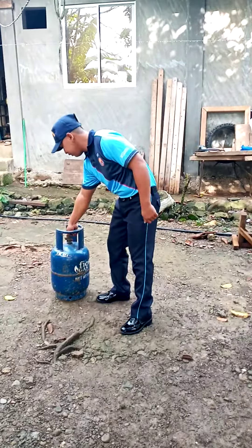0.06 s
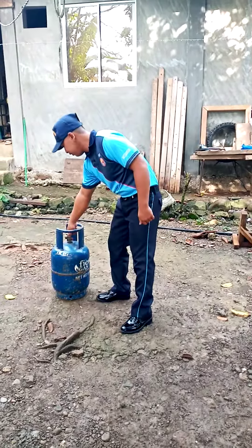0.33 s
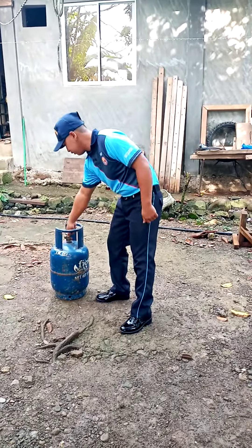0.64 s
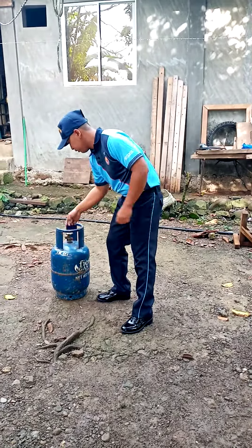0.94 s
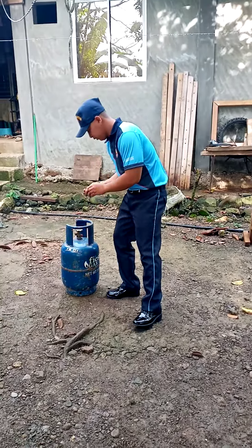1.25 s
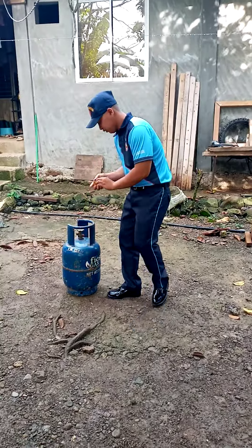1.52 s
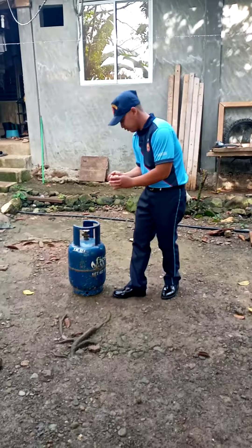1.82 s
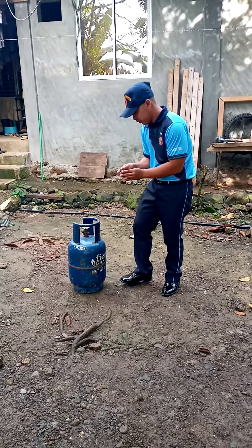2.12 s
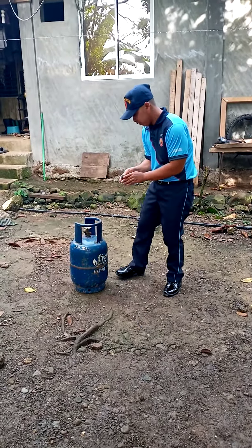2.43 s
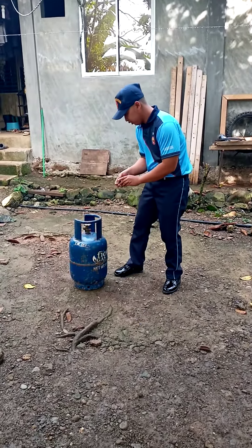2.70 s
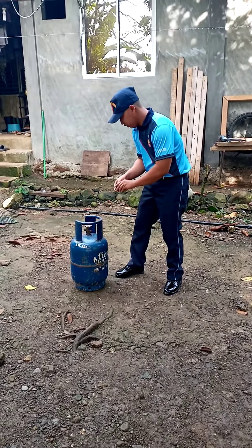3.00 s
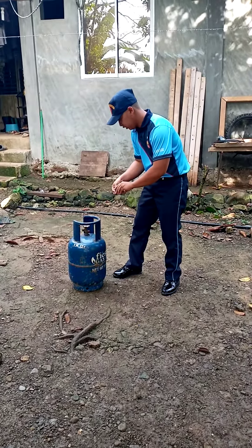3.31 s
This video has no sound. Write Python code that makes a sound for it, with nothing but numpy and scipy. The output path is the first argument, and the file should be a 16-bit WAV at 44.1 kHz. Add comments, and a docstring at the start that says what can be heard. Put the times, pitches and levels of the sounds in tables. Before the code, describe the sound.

A hiss of gas escapes from a cylinder valve in a dirt yard, heard through one microphone. Early spurts and a low thump give way to a steady jet, while a rough lower rush fades and shoes scuff lightly.

```python
"""Gas escaping from the valve of a steel cylinder, heard through one microphone in a dirt yard.
The valve is opened by hand; the jet hisses through the resonances of the outlet, with a ragged lower
rush that dies away. It surges a few times, once with a low thump. Softer bumps and gritty scuffs of
hands and shoes lie underneath. Ground and house wall scatter the hiss; faint noise comes from far off."""
import sys
import numpy as np
from scipy import signal
from scipy.fft import rfft, irfft, next_fast_len
from scipy.io import wavfile
from scipy.ndimage import map_coordinates

SR = 44100
rng = np.random.default_rng(int(sys.argv[2]) if len(sys.argv) > 2 else 0)


def inscribe(sig):
    """Save sig as 16-bit PCM at rate SR to the path in sys.argv[1].

    A 1-D sig is mono; a 2-D sig holds one channel per row.
    Samples are clipped to [-1, 1] before scaling.
    """
    pcm = np.round(np.clip(np.atleast_2d(sig).T, -1, 1) * 32767)
    wavfile.write(sys.argv[1], SR, pcm.astype(np.int16))


N = 156555
TIME = np.arange(N) / SR


def from_db(db):
    """Decibels to gain."""
    return 10 ** (np.asarray(db) / 20)


def rms_one(x):
    """Scale to rms 1."""
    return x / np.sqrt(np.mean(x ** 2) + 1e-20)


def curve(rows):
    """Join (time_s, value) points by straight lines."""
    return np.interp(TIME, *np.transpose(rows))


def coloured(gain_at):
    """Noise of rms 1 whose spectrum is a function of frequency."""
    size = next_fast_len(N)
    hz = np.maximum(np.fft.rfftfreq(size, 1 / SR), 1)
    return rms_one(irfft(rfft(rng.standard_normal(size)) * gain_at(hz), size)[:N])


def noise(points):
    """Noise of rms 1 with a spectrum of (freq_hz, relative_db) points."""
    at, db = np.transpose(points)
    return coloured(lambda hz: from_db(np.interp(np.log(hz), np.log(at), db)))


def flutter(rate_hz):
    """Slow random wander of rms 1."""
    return coloured(lambda hz: 1 / (1 + (hz / rate_hz) ** 2))


def envelope(start, attack, hold, fade_db_per_s):
    """Straight rise, hold, even fade in dB."""
    age = TIME - start
    return np.clip(age / attack, 0, 1) * from_db(-fade_db_per_s * np.maximum(age - attack - hold, 0))


def echoes(direct, level_db=-1, t60_s=0.24):
    """Ground and house wall scatter a short tail to the microphone, finely combing the sound."""
    tail = rng.standard_normal(N) * from_db(-60 * np.minimum(TIME / t60_s, 2))
    return direct + from_db(level_db) * signal.fftconvolve(direct, tail / np.linalg.norm(tail))[:N]


def outlet_ring(modes, low_hz=1960):
    """Turbulence rings in the resonances of the outlet, which radiates little below low_hz."""
    def gain_at(hz):
        power = sum(from_db(db) ** 2 / (1 + ((hz - f) / width) ** 2) ** 2 for f, width, db in modes)
        return np.sqrt(power / (1 + (low_hz / hz) ** 20))
    return coloured(gain_at)


# Resonances of the outlet: pitch_hz, half_width_hz, relative_db
OUTLET_MODES = [(2190, 130, -9.5), (2475, 48, -4), (2672, 148, 0), (2890, 130, -10), (3330, 130, -11.5),
                (3810, 75, -16), (6600, 102, -10.5), (6836, 31, -11), (7114, 100, -12), (7380, 70, -10.5),
                (7585, 118, -17), (7771, 71, -15), (10217, 43, -17), (10766, 310, -21.5),
                (11060, 165, -18.5), (11520, 55, -19), (11739, 36, -18), (12089, 46, -19.5),
                (15694, 52, -16)]
# Tone of the lowest resonances as the valve opens: time_s, level_db
TONE_LEVEL = [(0, -51.5), (.218, -51), (.226, -39.5), (.26, -38.5), (.285, -46), (.33, -46), (.37, -39.5),
              (.62, -39), (.68, -37), (.87, -38.5), (1.06, -38), (1.14, -40), (1.22, -40), (2.25, -38.5),
              (2.6, -40.5), (2.92, -39), (3.0, -40), (3.55, -41)]
# That tone creeping upwards: time_s, pitch_ratio
TONE_TUNING = [(0, 0.98), (1.2, 0.98), (2.3, 1.0), (3.55, 1.008)]
# Broad hiss of the jet, before its tilt: freq_hz, relative_db
HISS_SPECTRUM = [(1500, -30), (1900, -14), (2700, -2), (3130, -7), (3400, -3), (4000, -6), (4700, -14),
                 (5650, -4), (6050, -8), (7000, -4), (9200, -5.5), (10600, -1.5), (11900, -7), (13100, -10),
                 (15800, 2)]
# Hiss and upper resonances together: time_s, level_db
HISS_LEVEL = [(0, -43.5), (.21, -48), (.228, -44), (.26, -39), (.3, -45), (.6, -38.5), (1.05, -39.5),
              (1.6, -41), (3.55, -42.5)]

def jet(split_hz=5000, waver_share=0.006, tilt_db_per_octave=-2, whistle_db=-4):
    """The outlet sounds a rough tone under a hiss with thin whistles; both flutter together."""
    tone = outlet_ring([mode for mode in OUTLET_MODES if mode[0] < split_hz])
    pitch_ratio = curve(TONE_TUNING) + waver_share * flutter(rate_hz=6.94)  # wavers with the flow
    tone = map_coordinates(tone, [np.cumsum(pitch_ratio)], order=3, mode="wrap")
    whistles = outlet_ring([mode for mode in OUTLET_MODES if mode[0] >= split_hz])
    broad = noise([(hz, db + tilt_db_per_octave * np.log2(hz)) for hz, db in HISS_SPECTRUM])
    hiss = rms_one(rms_one(echoes(broad)) + from_db(whistle_db) * whistles)
    unrest = flutter(rate_hz=16)
    tone_db = curve(TONE_LEVEL) + 0.6 * unrest
    hiss_db = curve(HISS_LEVEL) + 0.2 * unrest
    return from_db(tone_db) * tone + from_db(hiss_db) * hiss


# Ragged roar of gas, dying away: time_s, level_db
ROAR_LEVEL = [(0, -42), (.14, -52.5), (.22, -41.5), (.27, -55), (.32, -47), (.4, -41.5), (.6, -41.5),
              (.72, -46), (.78, -41), (.87, -54.5), (1.0, -39), (1.13, -42.5), (1.27, -46), (1.44, -41),
              (1.58, -45.5), (1.68, -40), (1.76, -45.5), (1.86, -42.5), (2.0, -45), (2.25, -46.5),
              (2.6, -49.5), (2.75, -50), (2.85, -54), (2.93, -49.5), (3.07, -68), (3.25, -59.5),
              (3.37, -67), (3.43, -56), (3.55, -62)]
# Its colour: freq_hz, relative_db
ROAR_SPECTRUM = [(200, -32), (450, -12), (650, -11), (1050, -0.5), (2700, 1.5), (4500, -15), (6800, -3.5),
                 (9000, -17), (16000, -20.5)]
# Rumble under the roar: time_s, level_db
RUMBLE_LEVEL = [(0, -64), (.3, -55.5), (.42, -49.5), (.65, -49), (.82, -66), (.89, -49.5), (.98, -38),
                (1.12, -46), (1.25, -53), (1.44, -52), (1.52, -56.5), (1.69, -51), (1.95, -72), (2.15, -70),
                (2.2, -54.5), (2.42, -54), (2.52, -77), (2.76, -55.5), (3.0, -86), (3.55, -70)]
# Its colour: freq_hz, relative_db
RUMBLE_SPECTRUM = [(30, -7), (60, -14), (95, 5.5), (170, 0.5), (230, -3), (400, -4), (600, -9.5),
                   (1200, -19.5)]

def rush():
    """A lower, unsteady roar of gas, partly echoed by the yard, with a rumble beneath it."""
    roar_db = curve(ROAR_LEVEL) + 1.75 * flutter(rate_hz=16)
    roar = rms_one(echoes(noise(ROAR_SPECTRUM)) + noise(ROAR_SPECTRUM))
    rumble_db = curve(RUMBLE_LEVEL) + 0.5 * flutter(rate_hz=36)
    return from_db(roar_db) * roar + from_db(rumble_db) * noise(RUMBLE_SPECTRUM)


# Surges at the valve: start_s, level_db, attack_s, hold_s, fade_db_per_s, treble_relative_db
SPURT_EVENTS = [(-.02, -47.5, 0.024, 0.16, 84, 5), (0.331, -30.5, 0.037, 0.034, 82, -3.5),
                (0.905, -32.7, 0.02, 0.066, 124, -1.5), (1.766, -42, 0.026, 0.057, 118, 5.5)]
# Their body: freq_hz, relative_db
BODY_SPECTRUM = [(60, -22), (200, -9.5), (700, -6.5), (1050, 0), (1800, -0.5), (2700, -4), (8000, -37)]
# Their treble: freq_hz, relative_db
TREBLE_SPECTRUM = [(1500, -25), (2800, 4), (5500, 1.5), (7000, 6.5), (8500, -3.5), (11000, -7),
                   (13000, -20), (15500, 1.5)]

def spurts():
    """Short surges of gas that open fast and fade."""
    body, treble = noise(BODY_SPECTRUM), noise(TREBLE_SPECTRUM)
    return sum(from_db(db) * envelope(start, attack, hold, fade) * (body + from_db(treble_db) * treble)
               for start, db, attack, hold, fade, treble_db in SPURT_EVENTS)


# Outdoor noise, far from the microphone: freq_hz, relative_db
YARD_SPECTRUM = [(20, -37), (60, 2), (140, 4), (250, -6), (600, -40), (2000, -16)]

def yard(level_db=-64):
    """Distant noise reaches the yard as a faint, steady bed."""
    return from_db(level_db) * noise(YARD_SPECTRUM)


# Hands on the cylinder, shoes on the dirt: start_s, level_db, slide_s, t60_s, centre_hz
SCUFF_EVENTS = [(0.026, -44.5, 0.015, 0.07, 396), (0.156, -42, 0.01, 0.15, 1570),
                (.19, -46.5, 0.02, 0.16, 427), (0.34, -33, 0.0086, .058, 1340),
                (1.115, -36, 0.014, 0.59, 2270), (1.625, -46, 0.01, 0.19, 316),
                (1.627, -42.5, 0.004, 0.1, 840), (1.791, -50, 0.021, 0.11, 300),
                (2.168, -53, 0.033, 0.44, 860), (2.3, -50, .035, 0.38, 1030), (2.568, -49, .02, .38, 860),
                (2.643, -44.5, 0.0099, 0.072, 1120), (2.692, -45, .008, 0.33, 1850),
                (2.692, -51.5, 0.046, 0.48, 890), (2.695, -57.5, 0.039, 0.35, 353),
                (3.163, -59, 0.013, 0.085, 1320)]

def scuffs(grains_per_s=2200, spread_db=2, edge_ratio=1.28, rise_share=0.41):
    """A sliding sole or hand sends dense, uneven grains through one broad resonance per scuff."""
    out = np.zeros(N)
    grit = (rng.random(N) < grains_per_s / SR) * rng.choice([-1, 1], N)
    grit = grit * from_db(spread_db * np.minimum(rng.exponential(1, N), 4))
    for start, db, slide, t60, hz in SCUFF_EVENTS:
        band = signal.butter(1, [hz / edge_ratio, hz * edge_ratio], "band", fs=SR, output="sos")
        scrape = rms_one(signal.sosfilt(band, signal.sosfilt(band, grit)))
        out += from_db(db) * envelope(start, rise_share * slide, slide, 60 / t60) * scrape
    return out


# Airy top of the jet: time_s, level_db
AIR_LEVEL = [(.215, -70), (.228, -43), (.265, -43), (.3, -55), (.325, -55), (.342, -43.5), (.8, -44.5),
             (1.4, -48.5), (3.55, -51)]
# Its colour: freq_hz, relative_db
AIR_SPECTRUM = [(9500, -11), (11000, 1), (13200, -7), (14200, -8), (14800, 14), (15800, 1)]

def jet_air():
    """A thin sizzle at the very top of the jet snaps on with the valve and scatters round the yard."""
    return from_db(curve(AIR_LEVEL)) * rms_one(echoes(noise(AIR_SPECTRUM)))


# A low thump and softer bumps: start_s, level_db, pitch_hz, t60_s, tail_relative_db
THUMP_EVENTS = [(0.9108, -14, 175, 0.039, -11), (0.9226, -26.5, 126, 0.16, -0.5),
                (.937, -26.5, 104.8, 0.4, -2.5), (1.626, -44.5, 168, 0.27, -1),
                (2.015, -47.5, 127.6, 0.25, -11.5), (2.305, -33, 101, 0.12, -14),
                (2.342, -39, 94, 0.15, -15), (2.378, -45, 99, .22, -10), (2.744, -48.5, 116, 0.093, -4)]
# What each rings with: pitch_ratio, relative_db, t60_share
THUMP_RING = [(.95, 0, 1), (1.25, -5, .6), (1.6, -8, .45), (2.2, -14, .3)]
# Their rumbling tail: freq_hz, relative_db
TAIL_SPECTRUM = [(20, -45), (38, -2), (52, -15), (90, 7), (250, -4.5), (550, -16.5), (1200, -58)]

def thumps(attack_s=0.0047, tail_attack_s=0.0095):
    """Each thump is a few damped low modes with a rumbling tail."""
    out, rumble = np.zeros(N), noise(TAIL_SPECTRUM)
    for start, db, hz, t60, tail_db in THUMP_EVENTS:
        thump = from_db(tail_db) * rumble * envelope(start, tail_attack_s, 0, 60 / t60)
        for ratio, mode_db, share in THUMP_RING:
            mode = np.sin(2 * np.pi * hz * ratio * (TIME - start))
            thump += from_db(mode_db) * envelope(start, attack_s, 0, 60 / (t60 * share)) * mode
        out += from_db(db) * thump
    return out


def scene():
    """Gas, scuffs and thumps over the quiet yard, in mono."""
    return (jet() + rush() + spurts() + yard() + scuffs() + jet_air() + thumps())[None]


def record(dry, low_hz=55.3, top_hz=15750):
    """The microphone thins the deep bass; the top is cut steeply."""
    thinned = signal.sosfilt(signal.butter(2, low_hz, "high", fs=SR, output="sos"), dry)
    return signal.sosfilt(signal.ellip(14, .1, 80, top_hz, fs=SR, output="sos"), thinned)


dry = scene()
out = record(dry)
inscribe(out)
```